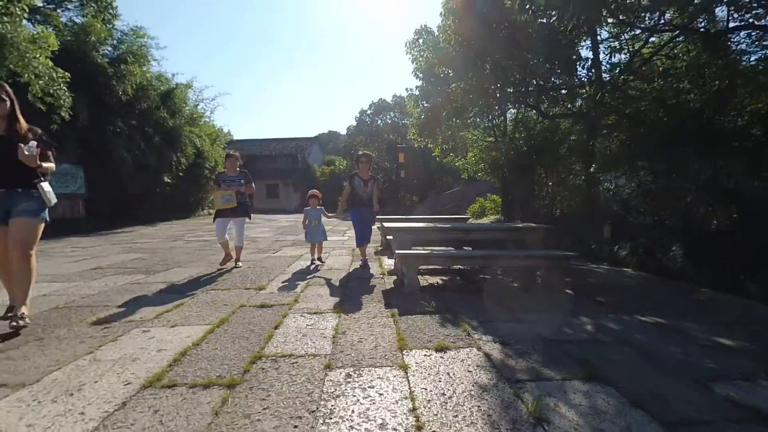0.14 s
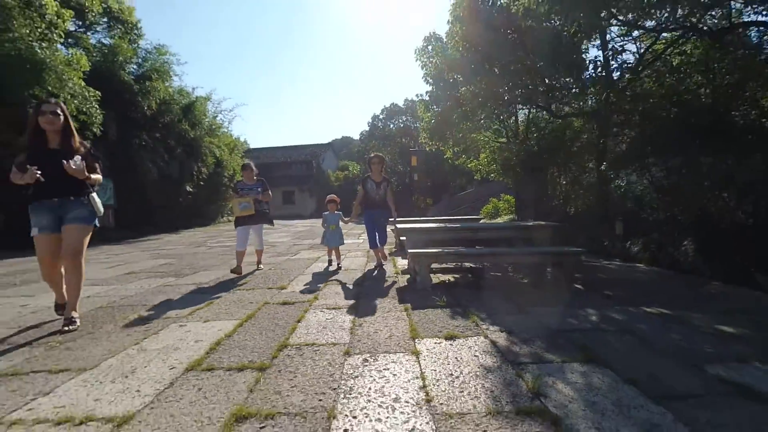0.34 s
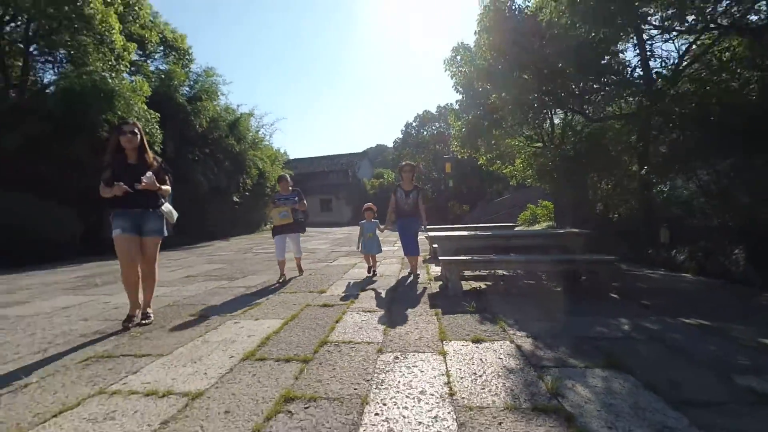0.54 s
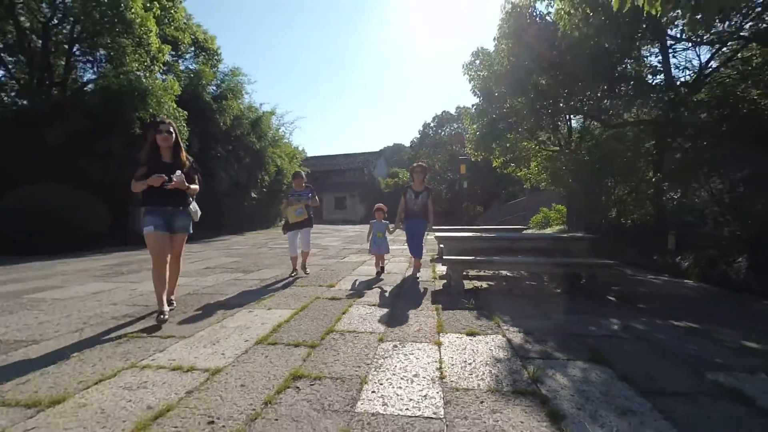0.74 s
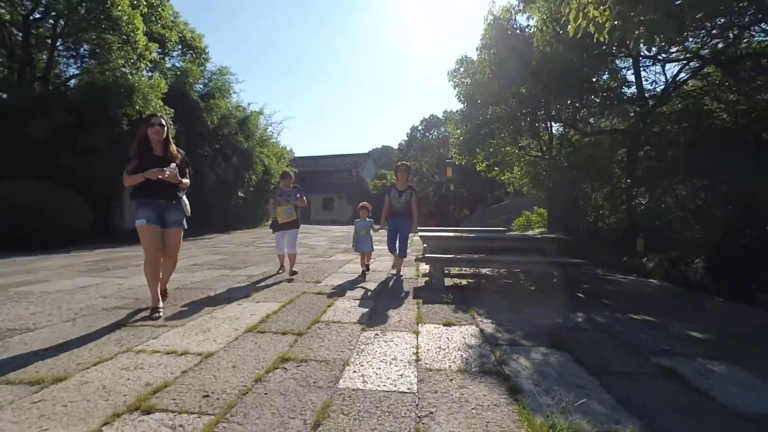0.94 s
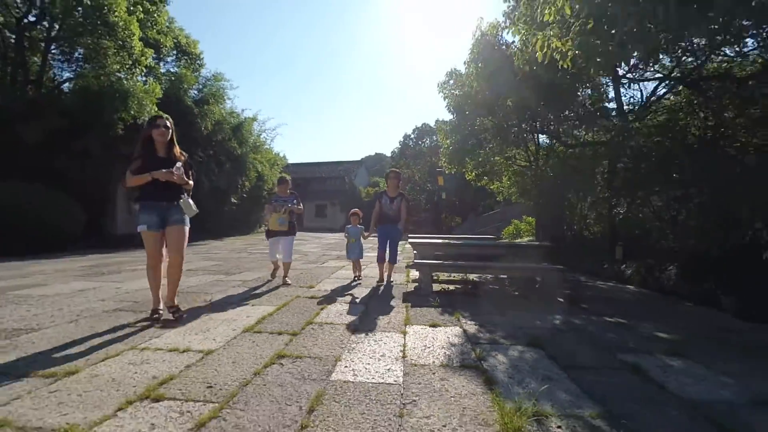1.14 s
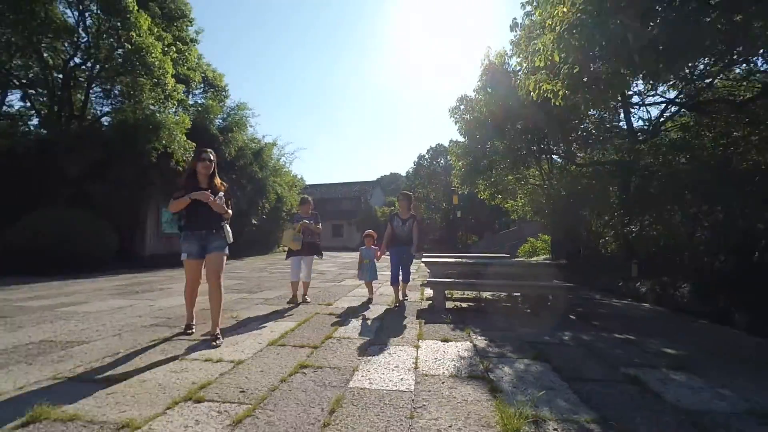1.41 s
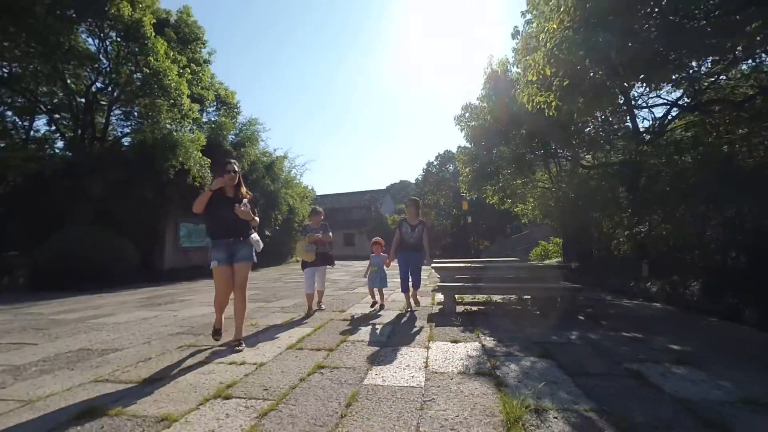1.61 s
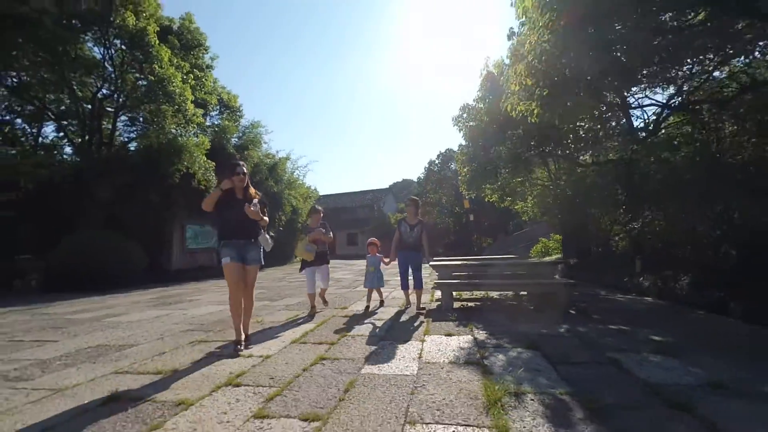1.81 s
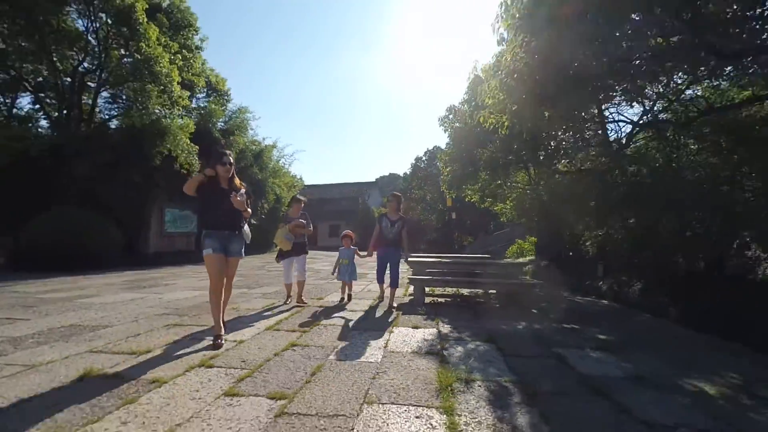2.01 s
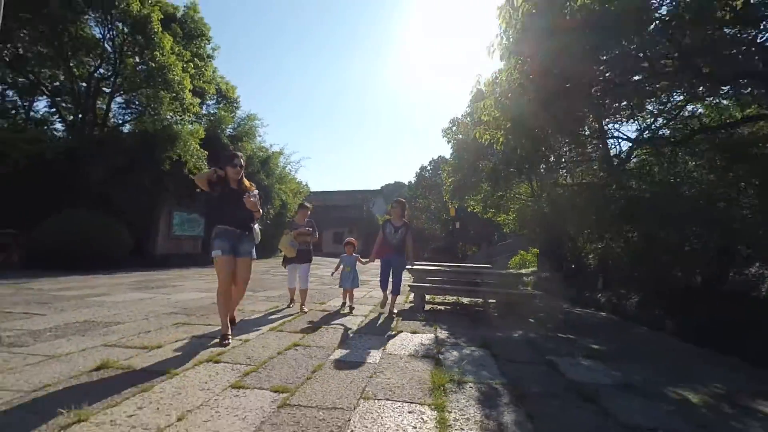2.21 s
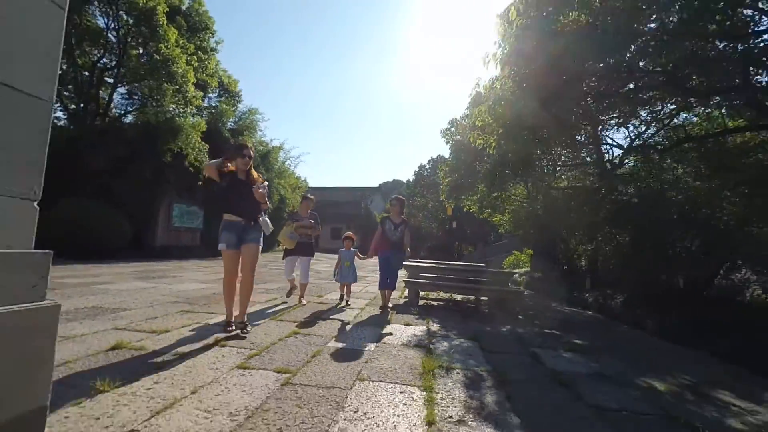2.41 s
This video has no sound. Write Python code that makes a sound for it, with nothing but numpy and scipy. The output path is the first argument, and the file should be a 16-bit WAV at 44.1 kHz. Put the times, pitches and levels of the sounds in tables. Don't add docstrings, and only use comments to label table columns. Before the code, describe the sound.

Loud cicadas buzz continuously in trees along a stone path, one near singer pulsing fast over a hissing crowd; soft footstep thuds, wind rumble and handling bumps reach a hand-held mono microphone.

```python
import sys
import numpy as np
from scipy import signal
from scipy.fft import rfft, irfft, next_fast_len
from scipy.io import wavfile
from scipy.ndimage import uniform_filter1d, map_coordinates

SR = 44100
rng = np.random.default_rng(int(sys.argv[2]) if len(sys.argv) > 2 else 0)


def convert_level_to_amplitude(level_db):
    exponent = np.asarray(level_db, float) / 20
    return 10 ** exponent


def digitize_waveform(pressure):
    field = np.atleast_2d(pressure).T
    bounded = np.clip(field, -1, 1)
    quanta = np.round(bounded * 32767).astype(np.int16)
    wavfile.write(sys.argv[1], SR, quanta)


N = 112454

# time_s, level_db
CHORUS_LEVEL = [(0.0, -25.5), (0.01, -29), (0.08, -28), (0.74, -27), (1.77, -27.5), (1.99, -27),
                (2.38, -27.5), (2.54, -25.5), (2.55, -30.5)]
# time_s, level_db
BRIGHT_LEVEL = [(0, -46), (.4, -43.5), (.75, -40.5), (1.3, -39), (1.9, -38.5), (2.55, -39.5)]
# freq_hz, gain_db
CICADA_TONE = [(1000, -37.5), (2000, -30.5), (2600, -26),
               (2900, -25), (3500, -11.5), (4000, -11.5), (4500, -4.5), (5730, -3), (6900, -9.5), (8950, -14),
             (15400, -39)]
# centre_hz, width_hz, gain_db
AIR_SACS = [(3536, 290, 1), (4480, 200, -3.5), (5060, 290, 0), (5450, 120, -2.5), (6730, 900, 4.5)]
# freq_hz, gain_db
EVEN_TONE = [(3000, -55), (4200, -4), (5200, -5), (6500, -10), (8000, -6), (10000, -27)]
# freq_hz, gain_db
BRIGHT_TONE = [(3000, -15), (6000, -18.5), (8500, -3.5), (11000, -6.5), (13500, -15.5), (15500, -21)]
# freq_hz, gain_db
HASH_TONE = [(150, -26), (400, -2), (1000, 1.5), (2500, 1), (4000, -14.5), (10000, -16.5), (13000, -11.5),
             (15500, -9)]
# time_s, level_db
WIND_LEVEL = [(0, -46), (.4, -49), (.53, -41), (.63, -43), (.78, -50), (.94, -46), (1.1, -50), (1.19, -43),
              (1.31, -41), (1.36, -51), (1.43, -43), (1.6, -49), (1.71, -45), (1.86, -45), (1.98, -41),
              (2.08, -49), (2.46, -48), (2.55, -39)]
# freq_hz, gain_db
RUMBLE_TONE = [(8, -26), (24, -9), (52, -1.5), (85, -14.5), (160, -21.5), (300, -36.5), (600, -58)]
# freq_hz, gain_db
TRAFFIC_TONE = [(100, -3), (200, 1), (300, 0.5), (1000, -11.5), (3000, -33.5)]
# time_s, level_db
SWAY_LEVEL = [(0, -44), (.4, -53), (.6, -37.5), (1.1, -50), (1.28, -27.5), (1.5, -47), (1.85, -37),
              (2.3, -55), (2.55, -29)]
# start_s, length_s, level_db
GRIP_SHIVERS = [
    (1.689, 0.098, -29.5),
    (1.9, 0.13, -38),
    (0.0506, .2, -42.5),
    (0.45, 0.092, -36),
    (1.14, .08, -37),
]
# start_s, peak_db, thud_hz, scuff_db
FOOTSTEPS = [
    (0.4852, -22, 159.7, -42),
    (1.17, -35, 99, -58),
    (1.438, -33.5, 125, -55),
    (1.636, -40, 120, -51),
    (1.679, -30.5, 110, -51),
    (1.7751, -24, 109, -50),
    (1.92, -35, 129, -59),
    (2.517, -40.5, 109, -44),
]
CHANNEL_OFFSET = [-.0053, .0076]

RIBS, THROB_HZ, THROB_START_S = 6, 48.5, 0.0023
EVEN_HZ = 363


def unit(x):
    return x / np.sqrt(np.mean(x ** 2) + 1e-20)


def curve(rows):
    time_s, value = np.transpose(rows)
    return np.interp(np.arange(N) / SR, time_s, value)


def wobble(rate_hz):
    knots = rng.standard_normal(int(N * rate_hz / SR) + 4)
    return map_coordinates(knots, [np.arange(N) * rate_hz / SR])


def coloured(x, points, rings=()):
    m = 2 * next_fast_len(N // 2 + 8192)
    hz = np.fft.rfftfreq(m, 1 / SR)
    point_hz, point_db = np.transpose(points)
    db = np.interp(np.log(hz + 1), np.log(point_hz + 1), point_db, right=-90)
    for centre_hz, width_hz, gain_db in rings:
        db = db + gain_db / (1 + (2 * (hz - centre_hz) / width_hz) ** 2)
    cepstrum = irfft(np.log(convert_level_to_amplitude(db)), m)
    cepstrum[1:m // 2] *= 2
    cepstrum[m // 2 + 1:] = 0
    return irfft(rfft(x, m) * np.exp(rfft(cepstrum)), m)[:N]


def clicks(rate_hz, start_s, throb_db, jitter_s, scatter_db, rattle):
    wander_s, rattle_decay_s = 0.00006, 0.0016
    k = np.arange(int(N / SR * 600))
    draw = rng.standard_normal((len(k), 3))
    slow = uniform_filter1d(uniform_filter1d(draw[:, 2], size=12), size=12)
    time_s = start_s + (k - 0.5) / rate_hz + wander_s * unit(slow) + jitter_s * draw[:, 0]
    at = np.round(time_s * SR).astype(int)
    size = convert_level_to_amplitude(throb_db * np.cos(2 * np.pi * (k - 0.5) / RIBS) + scatter_db * draw[:, 1])
    inside = (at >= 0) & (at < N)
    train = np.bincount(at[inside], size[inside], N)
    tail = signal.lfilter([1], [1, -np.exp(-1 / (rattle_decay_s * SR))], train)
    return unit(unit(train) + rattle * unit(tail * rng.standard_normal(N)))


def leaves(x, t60_s, direct_db):
    t, hop = np.arange(SR // 8) / SR, 4096
    fade = np.sqrt(signal.windows.hann(2 * hop, sym=False))
    padded, out = np.pad(x, (hop, 2 * hop)), np.zeros(N + SR)
    starts = np.arange(0, N + hop, hop)
    tails = rng.standard_normal((len(starts), len(t))) * convert_level_to_amplitude(-60 * t / t60_s)
    pieces = padded[starts[:, None] + np.arange(2 * hop)] * fade
    for start, wet in zip(starts, signal.fftconvolve(pieces, tails, axes=1)):
        out[start:start + len(wet)] += wet
    return unit(convert_level_to_amplitude(direct_db) * x + unit(out[hop:hop + N]))


def near_singer():
    song = clicks(RIBS * THROB_HZ, THROB_START_S / 2, throb_db=5, jitter_s=0.0002, scatter_db=0, rattle=1.96)
    return leaves(song, 0.014, direct_db=-2.5)


def crowd():
    songs = np.zeros(N)
    for throb_hz in rng.uniform(40, 56, 8):
        song = clicks(RIBS * throb_hz, throb_hz / 1000, throb_db=1, jitter_s=0.0003, scatter_db=0.5, rattle=0.62)
        songs += convert_level_to_amplitude(1.2 * wobble(4)) * song
    return leaves(unit(songs), 0.063, direct_db=-7)


def far_blur():
    z = signal.stft(rng.standard_normal(N), nperseg=512)[2]
    field = uniform_filter1d(rng.standard_normal(z.shape), size=2, axis=0)
    field = uniform_filter1d(field, size=70, axis=1)
    return unit(signal.istft(z * convert_level_to_amplitude(1.3 * unit(field)), nperseg=512)[1][:N])


def even_singer():
    song = clicks(EVEN_HZ, 0, throb_db=2.5, jitter_s=0.000012, scatter_db=1.5, rattle=0.28)
    song = convert_level_to_amplitude(1.3 * wobble(2.2)) * song
    return unit(coloured(leaves(song, 0.048, direct_db=-35), EVEN_TONE))


def chorus():
    mix = convert_level_to_amplitude(-8) * near_singer() + convert_level_to_amplitude(-8) * crowd() + convert_level_to_amplitude(-1.5) * far_blur()
    bounce = round(SR / EVEN_HZ)
    mix = mix + 0.12 * np.pad(mix, (bounce, 0))[:N]
    mix = unit(coloured(mix, CICADA_TONE, AIR_SACS))
    throb_db = 0.9 * np.cos(2 * np.pi * THROB_HZ * (np.arange(N) / SR - THROB_START_S))
    return convert_level_to_amplitude(curve(CHORUS_LEVEL) + throb_db + 0.8) * unit(mix + convert_level_to_amplitude(-12) * even_singer())


def bright_singer():
    song = clicks(RIBS * THROB_HZ, 0.00057, throb_db=-2, jitter_s=0.0004, scatter_db=0.5, rattle=2.5)
    song = coloured(leaves(song, 0.059, direct_db=5), [(1000, -52)] + BRIGHT_TONE)
    return convert_level_to_amplitude(curve(BRIGHT_LEVEL) + 0.13 * wobble(1.8)) * unit(song)


def capsule_hash(song):
    smoothing_s, power = 0.0013, 1.18
    loudness = np.abs(uniform_filter1d(song ** 2, round(smoothing_s * SR))) ** (power / 2)
    return convert_level_to_amplitude(-50.5) * unit(coloured(loudness * rng.standard_normal(N), HASH_TONE))


def wind():
    lumps = convert_level_to_amplitude(0.74 * wobble(13.7)) * rng.standard_normal(N)
    return convert_level_to_amplitude(curve(WIND_LEVEL)) * unit(coloured(lumps, RUMBLE_TONE))


def far_traffic():
    return convert_level_to_amplitude(-57.5) * unit(coloured(rng.standard_normal(N), [(60, -13)] + TRAFFIC_TONE))


def hand_sway():
    sway = coloured(rng.standard_normal(N), [(1, -0.5), (9, 2.5), (20, -8), (40, -31)])
    return convert_level_to_amplitude(curve(SWAY_LEVEL)) * unit(sway)


def shivers():
    grip_hz, ramp_s = 53.9, 0.016
    t, out = np.arange(N) / SR, np.zeros(N)
    for start_s, length_s, level_db in GRIP_SHIVERS:
        since = t - start_s
        swing = np.clip(np.minimum(since, start_s + length_s - t) / ramp_s, 0, 1)
        out += convert_level_to_amplitude(level_db) * np.sin(2 * np.pi * grip_hz * since) * swing
    return out


def steps():
    hit_t60_s, thud_t60_s, shake_t60_s, scuff_t60_s = 0.012, 0.13, 0.18, 0.035
    shake_db, scuff_lead_s = -14, 0.014
    out, t = np.zeros(N + SR), np.arange(SR // 4) / SR
    low = signal.butter(2, [100, 260], "bandpass", fs=SR, output="sos")
    grit = signal.butter(2, [200, 950], "bandpass", fs=SR, output="sos")
    for start_s, peak_db, thud_hz, scuff_db in FOOTSTEPS:
        noise = rng.standard_normal((2, len(t)))
        decay = convert_level_to_amplitude(-60 * t / hit_t60_s) + 0.3 * convert_level_to_amplitude(-60 * t / thud_t60_s)
        thud = -np.sin(2 * np.pi * thud_hz * t) * decay
        shake = unit(signal.sosfilt(low, noise[0])) * convert_level_to_amplitude(shake_db - 60 * t / shake_t60_s)
        out[round(start_s * SR):][:len(t)] += convert_level_to_amplitude(peak_db) * (thud + shake)
        scuff = unit(signal.sosfilt(grit, noise[1])) * convert_level_to_amplitude(scuff_db - 60 * t / scuff_t60_s)
        out[round((start_s - scuff_lead_s) * SR):][:len(t)] += scuff
    return out[:N]


def scene():
    song = chorus() + bright_singer()
    low = wind() + far_traffic() + hand_sway() + shivers() + steps()
    return np.tile(song + capsule_hash(song) + low - low.mean(), (2, 1))


def top_cut(x):
    return signal.sosfilt(signal.butter(12, 15570, fs=SR, output="sos"), x)


def record(dry):
    hz = np.fft.rfftfreq(N, 1 / SR)
    limited = irfft(rfft(dry) * (hz < 15300), N)
    slow = unit(irfft(rfft(rng.standard_normal(N)) * (hz < 108), N))
    drift = convert_level_to_amplitude(-73) * slow * np.array([[1], [-1]])
    return top_cut(limited + drift + np.array(CHANNEL_OFFSET)[:, None])


dry = scene()
out = record(dry)
digitize_waveform(out)
```